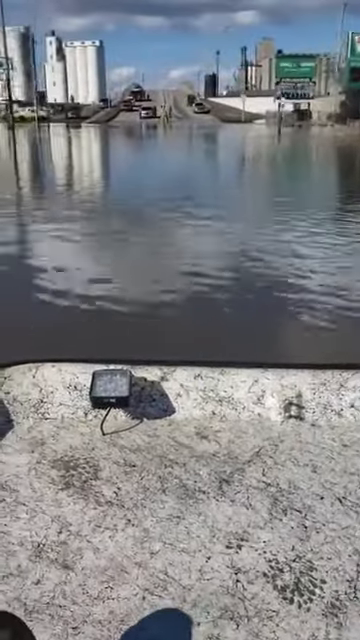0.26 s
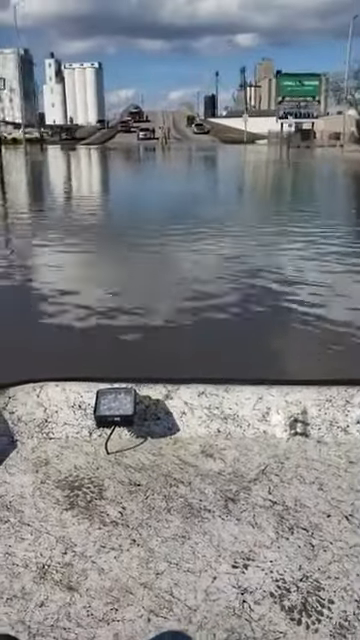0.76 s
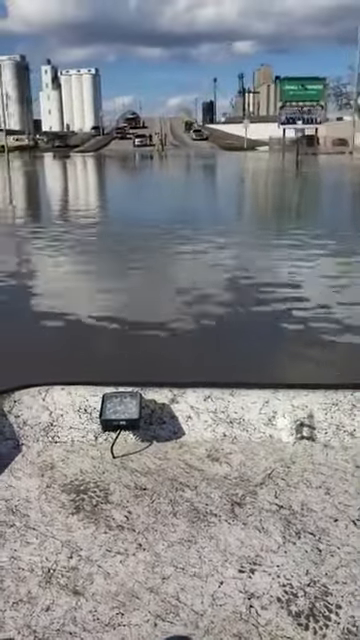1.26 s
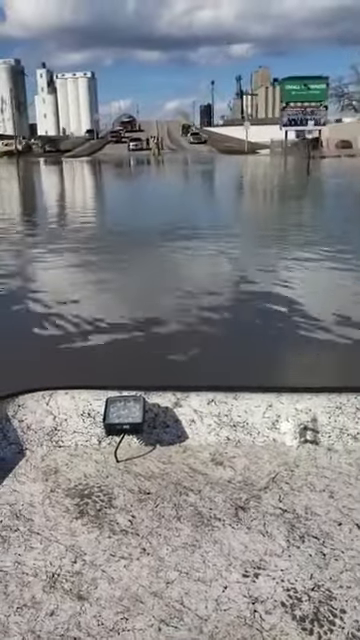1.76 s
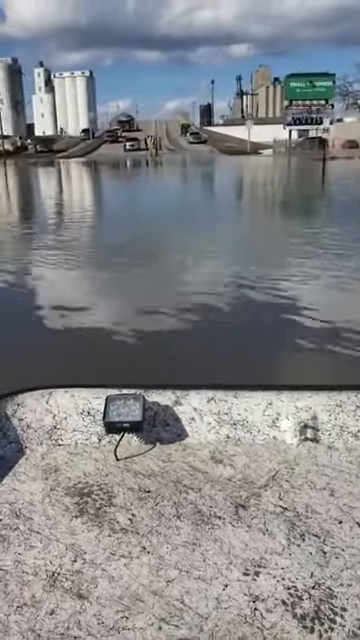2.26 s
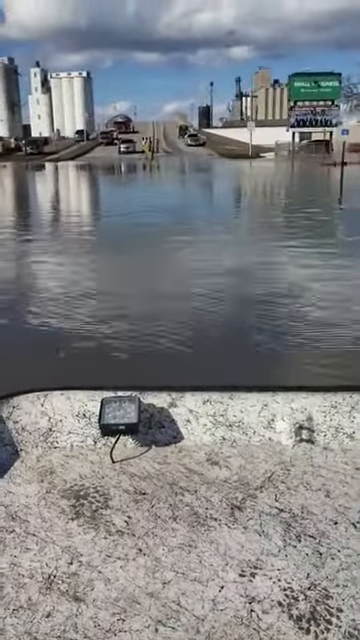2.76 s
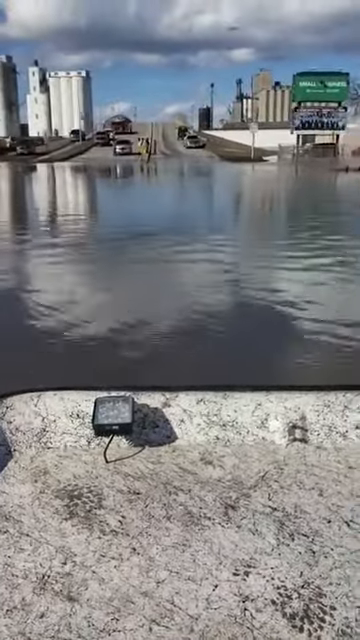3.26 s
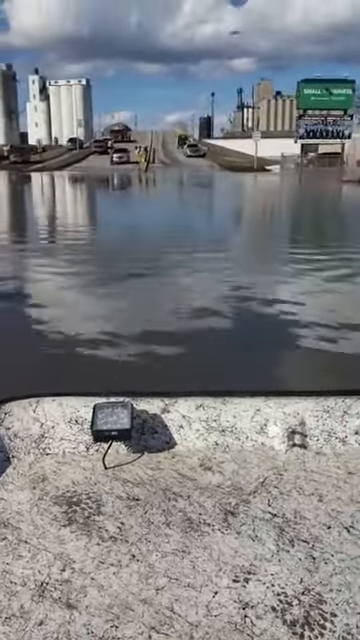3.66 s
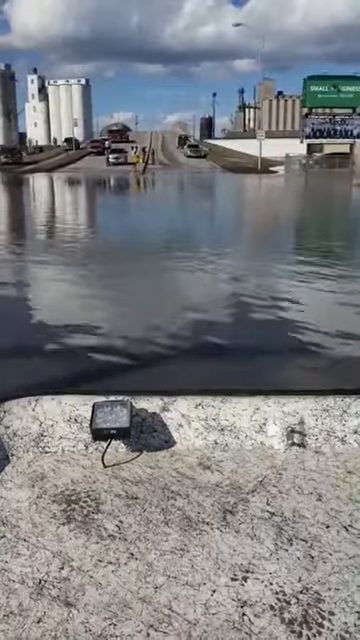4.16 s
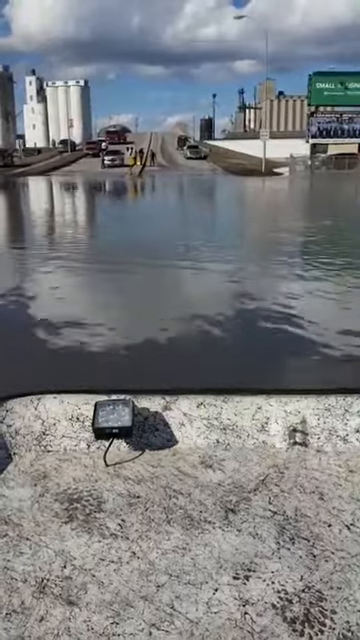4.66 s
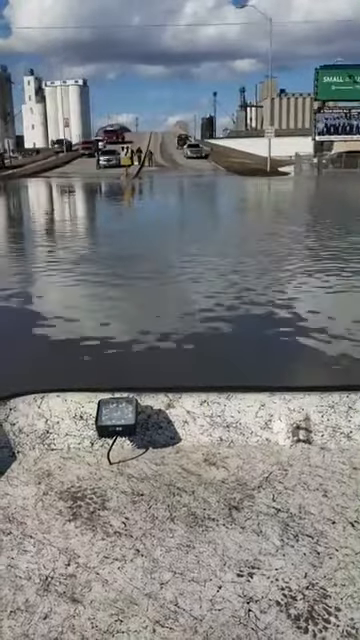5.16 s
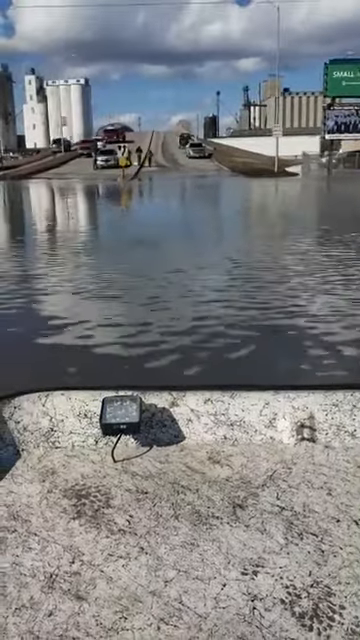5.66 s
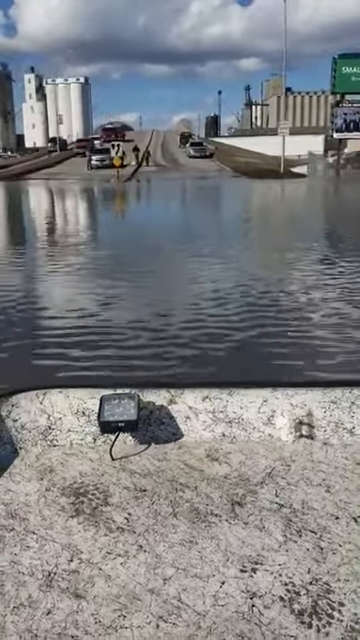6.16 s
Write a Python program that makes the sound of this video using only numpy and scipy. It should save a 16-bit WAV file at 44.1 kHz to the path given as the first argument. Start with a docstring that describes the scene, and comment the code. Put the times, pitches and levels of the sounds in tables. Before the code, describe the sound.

Heard from the seat, a throaty engine and chopping propeller roar hold steady, slide down to a lower lope, then climb partway back.

```python
"""Airboat on floodwater, heard from its seat. It cruises: a V8 exhaust (lines on crank orders, random thumps,
ragged comb) drones and lopes over a geared three-blade propeller (blade-rate tones, chopped noise roar);
gears whine faintly (wavering lines, band noise), air hisses and spray fizzes on the left (filtered noise, ticks).
From about 1.7 s the throttle eases off: beat, roar and whine sink. Near 4.4 and 4.7 s the pipe booms;
the throttle opens a little again, and speed sags slightly at the end."""
import sys
import numpy as np
from scipy import signal
from scipy.fft import rfft, irfft, next_fast_len
from scipy.io import wavfile
from scipy.ndimage import uniform_filter1d

SR = 44100
rng = np.random.default_rng(int(sys.argv[2]) if len(sys.argv) > 2 else 0)


def waveform_to_disk(signal):
    """Save audio, clipped to [-1, 1], as 16-bit WAV at the path in sys.argv[1]."""
    frames = np.transpose(np.atleast_2d(signal))
    scaled = np.clip(frames, -1, 1) * 32767
    samples = np.round(scaled).astype(np.int16)
    wavfile.write(sys.argv[1], SR, samples)


N = 282321
TIME_S = np.arange(N) / SR

# Engine speed: t/s, firing rate f/Hz
FIRING_SPEED = [(0, 169.9), (1.6, 170.3), (1.85, 166.9), (2.1, 157.5), (2.42, 150.9), (2.7, 133.8),
                (3.05, 122), (3.7, 116.9), (4.63, 116.7), (5, 127.9), (5.6, 139.5), (6, 144.6),
                (6.2, 142.1), (6.4, 136.3)]
# Exhaust note: t/s, level/dB
NOTE_LEVEL = [(0, -22), (.14, -19.5), (.24, -23.5), (.38, -18.5), (.56, -23), (.72, -19.5), (.88, -21.5),
              (1.02, -18.5), (1.22, -21.5), (1.38, -18.7), (1.56, -22), (1.74, -18), (1.88, -25.5),
              (1.98, -18), (2.08, -31.5), (2.15, -24), (2.42, -23), (2.49, -30.5), (2.65, -33.5),
              (2.73, -24.5), (2.84, -21.3), (2.92, -23), (3.9, -23), (4.5, -21), (4.73, -17), (5, -18.5),
              (5.15, -16.8), (5.55, -18.5), (5.7, -21.5), (6, -20), (6.4, -22.5)]
# Lines from unequal cylinders: multiple of crank speed, level/dB at low, half, full throttle
LOPE_ORDERS = [(1.5, -62, -48.5, -46.5), (2, -37, -41, -45), (2.5, -40.5, -34, -32), (3, -35.5, -47, -39),
               (3.5, -54, -34, -38.5), (4.5, -45, -46, -46.5), (5, -36, -32.5, -53.5),
               (5.5, -45, -56.5, -43.5), (6, -44, -60.5, -53.5), (8, -61, -44.5, -51),
               (10.5, -46, -54, -53.5)]
# Spectrum of firing thumps: f/Hz, relative density/dB
RUMBLE_SPECTRUM = [(10, -25), (26, -17), (42, -4), (60, 1.5), (80, 0.5), (110, -2.5), (170, -2.5),
                   (220, -4.5), (300, -24.5), (500, -58.5), (2000, -130)]
# Hollow resonance of the exhaust pipe: f/Hz, relative density/dB
PIPE_SPECTRUM = [(60, -71.5), (150, -26), (215, -7), (260, -6), (305, 4.5), (365, 6), (550, -26.5),
                 (2000, -120)]
# Pipe booms as the engine takes load again: crest t/s, half length t/s, rise/dB
PIPE_BOOMS = [(4.408, 0.07, 17), (4.66, 0.12, 18)]
# Spectrum of ragged exhaust puffs: f/Hz, relative density/dB
GROWL_SPECTRUM = [(60, -62.5), (170, -21), (230, 1), (330, -3.5), (500, -7.5), (880, -10.5), (1250, -13),
                  (1700, -32), (4000, -89)]
# Deep beat at the blade rate: t/s, level/dB
BEAT_LEVEL = [(0, -24.5), (.5, -22), (1.7, -23), (2.1, -26.3), (2.45, -30), (2.68, -32.5), (2.85, -41),
              (3.6, -42), (3.87, -37), (4.2, -39.5), (5.2, -36), (5.8, -32), (6.4, -33)]
# Propeller overtones: multiple of blade rate, level/dB at low, half, full throttle
BLADE_ORDERS = [(2, -45, -42, -37), (4, -42.5, -36.5, -38.5), (5, -45, -43, -43.5), (6, -48, -52, -46),
                (7, -59, -45, -49.5), (8, -54, -53, -50.5), (9, -63.5, -50.5, -45.5), (10, -59.5, -49, -61),
                (11, -69.5, -49.5, -50), (12, -57, -50, -55.5), (13, -59.5, -61.5, -52),
                (14, -66, -50.5, -57), (15, -68, -62, -52), (16, -70.5, -57, -54)]
# Spectrum of propeller turbulence: f/Hz, relative density/dB
ROAR_SPECTRUM = [(130, -25), (210, -6.5), (310, -3.5), (385, -7.5), (500, -7.5), (680, -12), (780, -9),
                 (870, -10.5), (970, -17), (1200, -16.5), (1450, -22.5), (1600, -35), (1900, -35.5),
                 (4000, -88)]
# Air and water thrown by the boat: t/s, wash level/dB (reference for roar, growl, hiss), spray level/dB
WASH_LEVEL = [(0, -36.5, -64.5), (0.3, -33.5, -62.5), (0.9, -33.5, -63), (1.5, -34.5, -63.5),
              (2.15, -35.5, -63.5), (2.65, -39, -65.5), (3.15, -41, -66), (3.6, -39.5, -66),
              (4.1, -39, -65), (4.65, -36, -63.5), (4.9, -37, -64), (5.4, -36.5, -63), (5.8, -35, -61.3),
              (6.4, -34.5, -61.8)]
# Gusts flaring (or, if negative, dipping) the roar: crest t/s, half length t/s, change/dB
ROAR_GUSTS = [(0.812, 0.057, 3.5), (1.03, 0.046, -1.5), (1.19, 0.045, 1.5), (1.337, 0.032, 1.5),
              (2.02, 0.025, 2.5), (2.25, 0.053, 5), (2.905, 0.054, 3.5), (3.54, 0.075, 2),
              (4.422, 0.032, 2.5), (5.06, 0.051, 3), (5.734, 0.061, 2), (6.07, 0.057, 2)]
# Gear tones before the whine gain: multiple of crank speed, level/dB
GEAR_ORDERS = [(48, -67.7), (50, -72.5)]
# Gain of gear tones and whirr, fading as the drive unloads: t/s, gain/dB
WHINE_GAIN = [(0, 8), (.85, 8.5), (1.4, 2), (1.9, 2), (2.3, -7), (3, -14), (4.5, -12), (6.4, -9)]
# Ring of the gear housing: f/Hz, relative density/dB
WHIRR_SPECTRUM = [(1200, -59.5), (1850, -7.5), (2060, 1), (2300, -7.5), (3200, -51)]
# Spectrum of spray: f/Hz, relative density/dB
SPRAY_SPECTRUM = [(4410, -34.5), (7500, -13), (7900, -8), (8570, 0), (8910, -1.5), (10400, -6.5),
                  (12400, -0.5), (14500, -12), (15500, -21)]
# Spectrum of passing air: f/Hz, relative density/dB
HISS_SPECTRUM = [(880, -31), (1500, -3.5), (1840, -5.5), (2060, -5.5), (2420, -7), (2850, -7.5),
                 (3780, -10), (4200, -9), (5220, -1), (5480, -5), (6000, -16.5), (6480, -12.5), (7620, -22),
                 (8000, -29.5), (10400, -61.5), (17600, -120)]
# Likeness of the ears: f/Hz, left-right correlation
EAR_CORRELATION = [(60, 0.77), (95, 0.34), (160, 0.56), (290, 0.55), (640, 0.42), (1000, 0.59),
                   (1410, -0.28), (2200, -0.3), (4000, -0.24), (6800, 0.053), (15000, 0)]
# Balance of the ears: f/Hz, left minus right level/dB
LEFT_BALANCE = [(60, 1), (170, 0.5), (330, 2.5), (520, 0.5), (750, -1.5), (1100, -6), (1700, 0), (3000, 0),
                (5200, 5), (7400, 3.5), (8700, 14), (10500, 7.5), (12000, 8), (15000, 12)]

CRUISE_HZ, LOW_HZ = 170, 117  # firing rates at full and low throttle
FIRINGS_PER_TURN = 4
BLADES_PER_TURN = 3 / 2.292  # three blades, reduction gear
WANDER_HZ, WANDERS_PER_S = .25, 4  # the engine never holds its speed exactly
LOAD_DB_PER_HZ_PER_S, LOAD_SMOOTH_S = 0.0681, .3  # lope: harder speeding up, softer running down
LOAD_S, LOAD_HALF_S = 4.36, 0.57  # the engine labours at low speed
BOOM_REST_DB = -54.5
HISS_DB, HISS_AT_WASH_DB, HISS_SHARE = -50, -34, 0.82  # hiss follows this share of the wash swing
SMEAR_S, SMEARS_PER_S = .00027, 6
LEFT_LEAD_S, LEAD_TOP_HZ = 0.00016, 500  # tones reach the left ear first; phase lead stops growing at the top
EDGE_HZ = 15650


def exhaust(crank, firing_hz, note_db, throttle):
    """Four firings a turn make the note; unequal cylinders add half orders that shift with throttle and pull."""
    firings = FIRINGS_PER_TURN * crank
    note = gain_of(note_db) * tone(firings, firing_hz.mean(), unsteady=0.045, flutter_hz=13)
    hz_per_s = np.gradient(firing_hz) * SR
    pull_db = LOAD_DB_PER_HZ_PER_S * uniform_filter1d(hz_per_s, size=round(LOAD_SMOOTH_S * SR))
    lope = orders(LOPE_ORDERS, crank, throttle, unsteady=0.49, flutter_hz=5.5)
    return note + gain_of(pull_db) * lope


def rumble(crank, throttle, level_db=-34.0, throttle_db=1.0, load_db=2):
    """Firings of random strength thump in the pipes; the pipe resonance booms under load."""
    fires = np.diff(np.floor(FIRINGS_PER_TURN * crank), prepend=0)
    thump_db = level_db + throttle_db * throttle + load_db * hump(LOAD_S, LOAD_HALF_S)
    thumps = gain_of(thump_db) * spread(fires * noise_pair(), RUMBLE_SPECTRUM)
    boom_db = BOOM_REST_DB + humps_db(PIPE_BOOMS)
    boom = gain_of(boom_db) * spread(fires * noise_pair(), PIPE_SPECTRUM)
    return thumps + boom


def growl(crank, wash_db, above_wash_db=-6, points=512):
    """Eight ragged exhaust puffs recur every two turns: a comb of weak, wavering lines."""
    shapes = rng.standard_normal((2, points))
    cycle_position = smear(crank) / 2
    grid = np.arange(points) / points
    puffs = np.array([np.interp(cycle_position, grid, shape, period=1) for shape in shapes])
    return gain_of(wash_db + above_wash_db) * spread(puffs, GROWL_SPECTRUM)


def propeller(blade, beat_db, throttle):
    """A deep beat at the blade rate, and overtones that flutter in turbulent air."""
    beat = gain_of(beat_db) * tone(blade, mean_hz(blade), unsteady=0.09, flutter_hz=6.4)
    return beat + orders(BLADE_ORDERS, smear(blade), throttle, unsteady=0.47, flutter_hz=5.7)


def roar(blade, crank, roar_db, chop=0.14, rasp=0.11, gust_db=0.73):
    """Turbulent air, swelling at each blade pass, with each firing and in quick gusts."""
    blade_swell = chop * np.cos(2 * np.pi * blade)
    firing_swell = rasp * np.cos(2 * np.pi * FIRINGS_PER_TURN * crank)
    swell = (1 + blade_swell + firing_swell) * gain_of(gust_db * waver(24))
    return gain_of(roar_db) * spread(swell * noise_pair(), ROAR_SPECTRUM)


def whine(crank, whine_db, throttle, idle_whirr_db=-97, throttle_db=24):
    """Gear-mesh tones, blurred near cruise by the whirr of their housing."""
    crank_hz = mean_hz(crank)
    lines = sum(gain_of(db) * tone(k * crank, k * crank_hz, unsteady=2.5, flutter_hz=12)
                for k, db in GEAR_ORDERS)
    whirr = gain_of(idle_whirr_db + throttle_db * throttle) * spread(noise_pair(), WHIRR_SPECTRUM)
    return gain_of(whine_db) * (lines + whirr)


def spray(spray_db, drops_per_s=900, drop_share=.28, size_db=0.5, brighten=.5):
    """Fine fizz with single droplets ticking in it; thicker spray is brighter."""
    sizes = gain_of(size_db * np.minimum(rng.exponential(1, (2, N)), 4))
    landed = rng.random((2, N)) < drops_per_s / SR
    drops = sizes * rng.choice([-1, 1], (2, N)) * landed
    fizz = spread(noise_pair() + drop_share * evened(drops), SPRAY_SPECTRUM)
    highpass = signal.butter(3, 11000, "high", fs=SR, output="sos")
    mist = signal.sosfiltfilt(highpass, fizz)
    mist_db = brighten * (spray_db - spray_db.mean())
    return gain_of(spray_db) * (fizz - mist + mist * gain_of(mist_db))


def hiss(hiss_db, flicker_db=0.8):
    """Air rushing past the boat: band noise with a slight flicker."""
    return gain_of(hiss_db + flicker_db * waver(26)) * spread(noise_pair(), HISS_SPECTRUM)


def orders(table, shaft, throttle, unsteady, flutter_hz):
    """Lines on multiples of a shaft's speed, each following the throttle in its own way."""
    shaft_hz = mean_hz(shaft)
    return sum(at_throttle(levels_db, throttle) * tone(k * shaft, k * shaft_hz, unsteady, flutter_hz)
               for k, *levels_db in table)


def tone(turns, hz, unsteady, flutter_hz):
    """Line on a shaft angle; turbulence shakes strength and phase, differing by ear where correlation is low."""
    def shake():
        return unsteady * (waver(flutter_hz) + 1j * waver(flutter_hz)) / np.sqrt(2)

    apart = np.sqrt(np.clip(1 - read(EAR_CORRELATION, hz), 0, 1) / 2) * shake()
    body = 1 + shake()
    lead = np.exp(1j * np.pi * min(hz, LEAD_TOP_HZ) * LEFT_LEAD_S)  # half of it per ear
    lean = gain_of(read(LEFT_BALANCE, hz) / 2) * lead
    carrier = np.exp(2j * np.pi * (turns + rng.random()))
    ears = np.array([(body + apart) * lean, (body - apart) / lean])
    return (ears * carrier).real * np.sqrt(2 / (1 + unsteady ** 2))


def spread(pair, spectrum):
    """Colours two unrelated noises and shares them between the ears; their mean has unit deviation."""
    size = next_fast_len(N, True)
    hz = np.fft.rfftfreq(size, 1 / SR)
    a, b = rfft(pair, size)
    alike = np.clip(read(EAR_CORRELATION, hz), -.9, .99)
    lean = gain_of(read(LEFT_BALANCE, hz) / 2)
    ears = np.array([a * lean, (alike * a + np.sqrt(1 - alike ** 2) * b) / lean])
    mean_gain = np.sqrt(lean ** 2 + lean ** -2 + 2 * alike)
    colour = gain_of(read(spectrum, hz)) / mean_gain
    out = irfft(ears * colour, size)[:, :N]
    return out / np.std(out.mean(0))


def smear(shaft):
    """Shaft angle as it arrives through churning air, a little early or late: high lines waver most."""
    return shaft + mean_hz(shaft) * SMEAR_S * waver(SMEARS_PER_S)


def waver(hz):
    """Smooth chance of unit rms, low-passed near hz."""
    points, rate_hz = 4096, 512
    f = np.fft.rfftfreq(points, 1 / rate_hz)
    slow = irfft(rfft(rng.standard_normal(points)) / (1 + (f / hz) ** 4))
    return evened(np.interp(TIME_S, np.arange(points) / rate_hz, slow))


def noise_pair():
    """Two unrelated white noises."""
    return rng.standard_normal((2, N))


def hump(crest_s, half_s):
    """A smooth rise to one and back."""
    return np.exp(-((TIME_S - crest_s) / half_s) ** 2)


def humps_db(table):
    """Sum of level humps."""
    return sum(db * hump(crest_s, half_s) for crest_s, half_s, db in table)


def at_throttle(levels_db, throttle):
    """Gain between the levels for low, half and full throttle."""
    return gain_of(np.interp(throttle, [0, .5, 1], levels_db))


def mean_hz(shaft):
    """Mean speed of a shaft angle in turns."""
    return shaft[-1] / TIME_S[-1]


def gain_of(db):
    """Decibels to a factor."""
    return 10 ** (np.asarray(db) / 20)


def evened(x):
    """Scales to an rms of one."""
    return x / np.sqrt(np.mean(x ** 2) + 1e-20)


def follow(table):
    """The columns of a curve table at every sample."""
    s, *columns = np.transpose(table)
    return [np.interp(TIME_S, s, c) for c in columns]


def read(points, hz):
    """A spectrum table on a log-frequency axis."""
    f, value = np.transpose(points)
    return np.interp(np.log(hz + 1), np.log(f + 1), value)


def scene(eddy_db=0.84, eddies_hz=7, ripple_db=0.35, ripples_hz=7, roar_above_wash_db=-2.0):
    """One crankshaft drives exhaust, gears and propeller; gusts and eddies sway the roar, ripples the spray."""
    [firing_hz] = follow(FIRING_SPEED)
    wash_db, spray_db = follow(WASH_LEVEL)
    [note_db], [beat_db], [whine_db] = follow(NOTE_LEVEL), follow(BEAT_LEVEL), follow(WHINE_GAIN)
    wandering_hz = firing_hz + WANDER_HZ * waver(WANDERS_PER_S)
    crank = np.cumsum(wandering_hz / FIRINGS_PER_TURN) / SR  # turns
    blade = crank * BLADES_PER_TURN  # blade passes
    throttle = (firing_hz - LOW_HZ) / (CRUISE_HZ - LOW_HZ)
    roar_db = wash_db + roar_above_wash_db + eddy_db * waver(eddies_hz) + humps_db(ROAR_GUSTS)
    hiss_db = HISS_DB + HISS_SHARE * (wash_db - HISS_AT_WASH_DB)
    pipes = exhaust(crank, firing_hz, note_db, throttle) + rumble(crank, throttle) + growl(crank, wash_db)
    air = propeller(blade, beat_db, throttle) + roar(blade, crank, roar_db) + hiss(hiss_db)
    gears = whine(crank, whine_db, throttle)
    water = spray(spray_db + ripple_db * waver(ripples_hz))
    return pipes + air + gears + water


def record(dry):
    """Band limit: linear-phase low-pass."""
    lowpass = signal.firwin(511, EDGE_HZ, window=("kaiser", 9), fs=SR)
    return signal.oaconvolve(dry, lowpass[None], "same")


dry = scene()
out = record(dry)
waveform_to_disk(out)
```